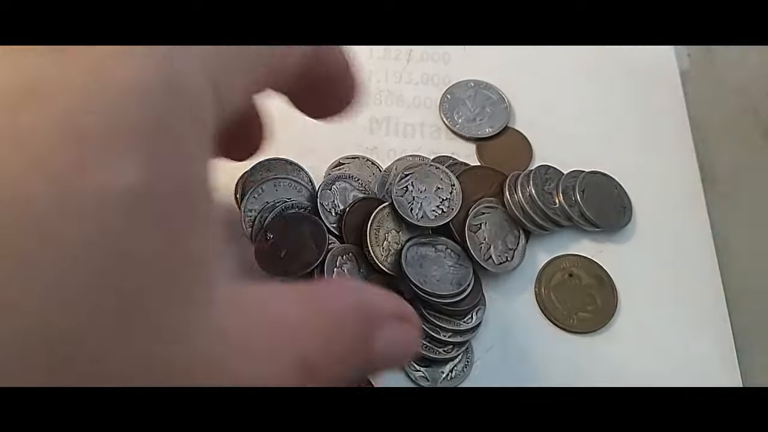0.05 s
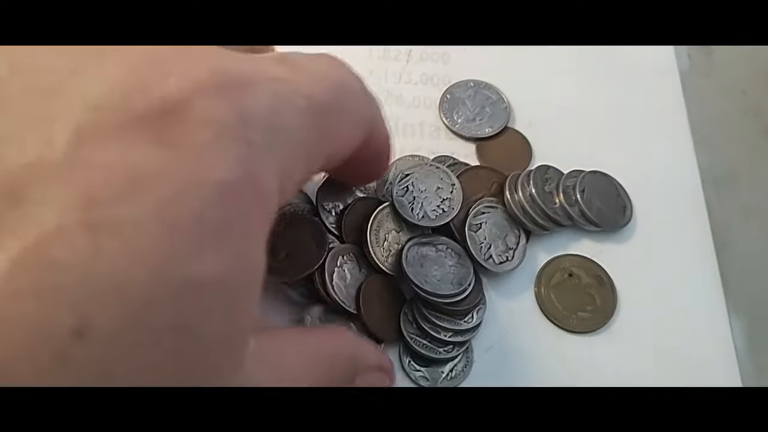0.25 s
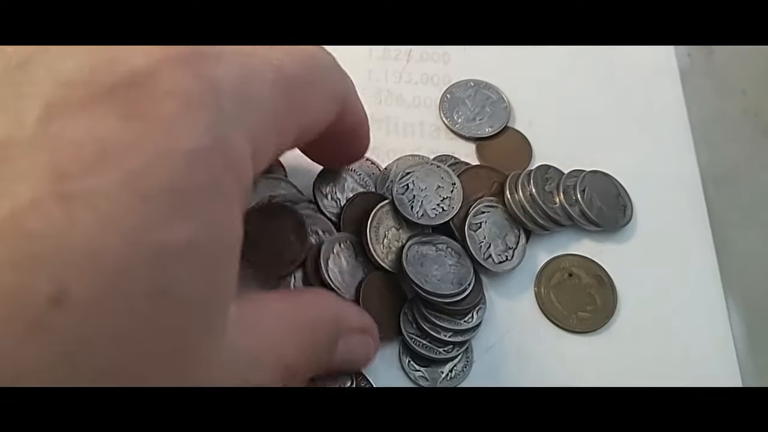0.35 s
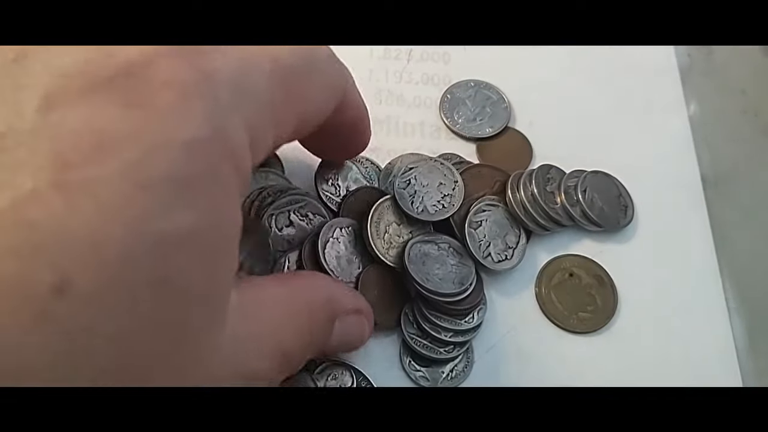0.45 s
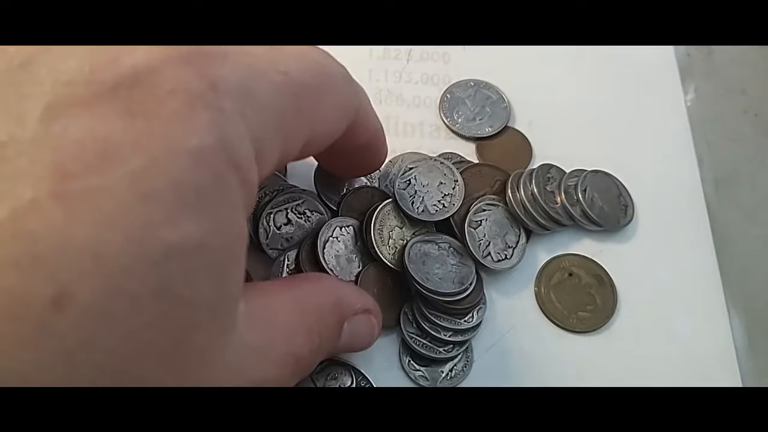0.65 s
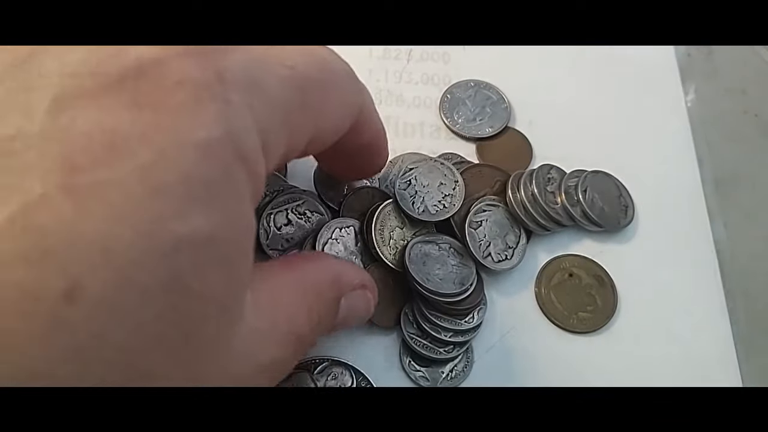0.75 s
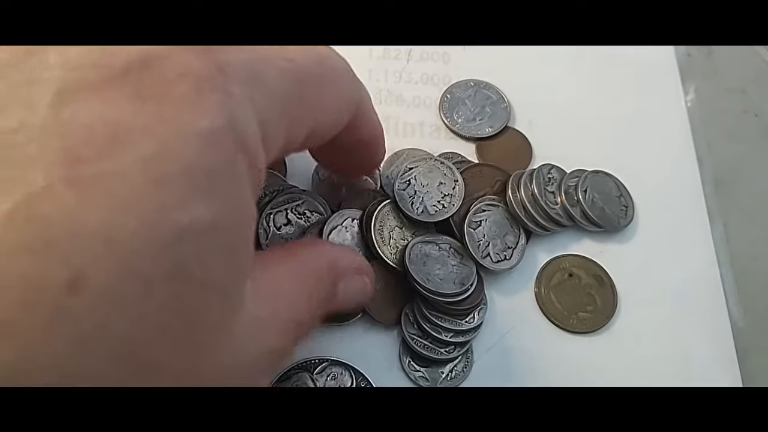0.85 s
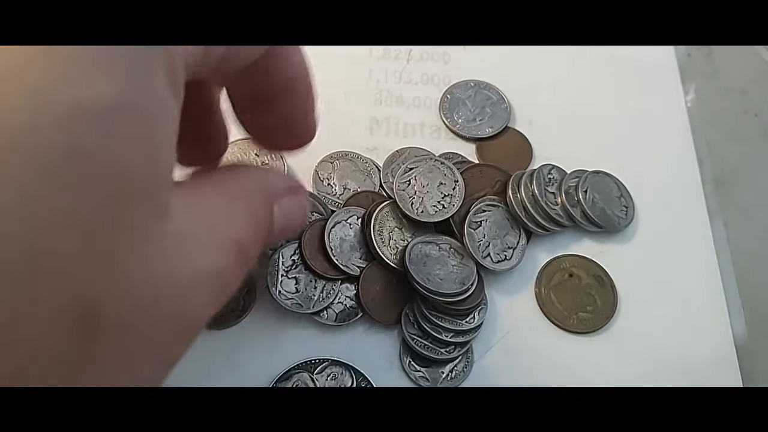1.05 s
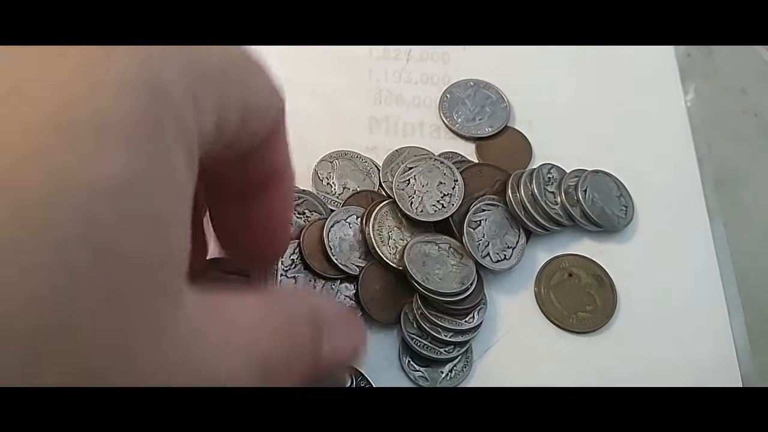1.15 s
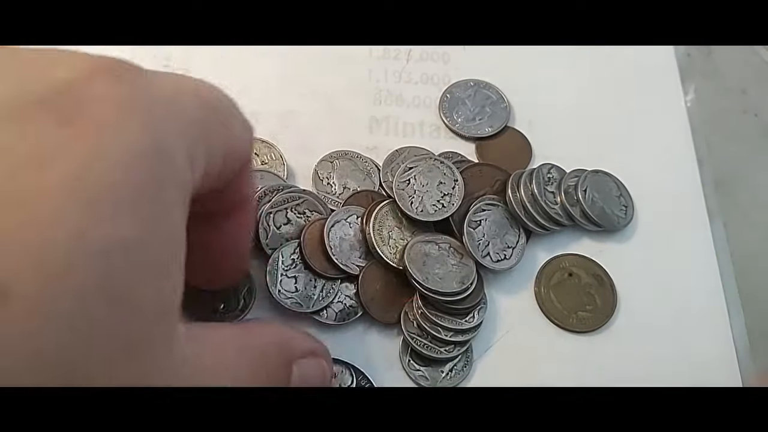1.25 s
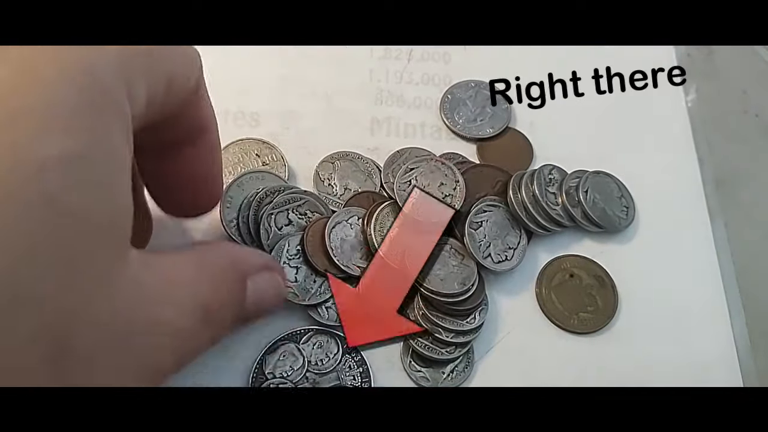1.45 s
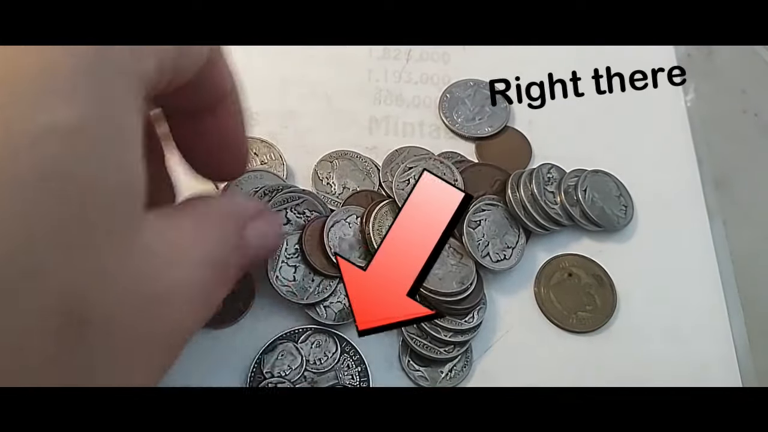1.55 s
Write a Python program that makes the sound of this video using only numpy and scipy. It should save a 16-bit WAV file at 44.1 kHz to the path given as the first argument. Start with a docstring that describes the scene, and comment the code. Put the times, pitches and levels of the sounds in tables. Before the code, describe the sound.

Metal coins clink and tick close by as a hand pushes a heap over paper with a faint scrape. Stacks drop and thump the table at about 0.2 and 0.6 seconds. From 0.7 seconds a coin rocks to rest with hollow knocks that get softer and quicker. At 1 second a last coin slips off with a bright clink, leaving only the faint tone of a small, quiet room.

```python
"""Coins tick and ring against each other as a hand pushes the heap over a sheet of paper on a table.
Twice a stack drops and the table top booms. Then a coin rocks to rest with hollow knocks,
and a last one slips off the heap with a bright clink.
Close to a stereo microphone in a small, quiet room: a short tail and faint room tone."""
import sys
import numpy as np
from scipy import signal
from scipy.fft import rfft, irfft
from scipy.io import wavfile
from scipy.ndimage import uniform_filter1d

SR = 44100
rng = np.random.default_rng(int(sys.argv[2]) if len(sys.argv) > 2 else 0)


def wrap_up_sound(samples):
    """Save the sound to the file named by the first command line argument, as 16-bit audio."""
    columns = np.atleast_2d(samples).T
    # keep every value between -1 and 1, then stretch to whole-number steps
    tamed = np.clip(columns, -1, 1)
    steps = np.round(tamed * 32767).astype(np.int16)
    wavfile.write(sys.argv[1], SR, steps)


N = 70560
T = np.arange(int(.4 * SR)) / SR  # time axis of one contact, s
TICK_RISE_S = .0006


def coin_ticks(rattle_decay_s=0.02, patchy_db=4.5):
    """Edge hits edge: a bright tick, each with its own uneven colour, then the neighbours rattle briefly."""
    # coin against coin: start_s, level_db, decay_s, pan_db, tilt_db_per_octave, rattle_db (re tick), kind
    contacts = [(0.0922, -60.5, 0.0045, -1, -4, -21, "heap"), (.1325, -39, 0.0019, 2, 2, -19, "heap"),
                (0.154, -43, 0.0017, -1, -1.5, -26, "heap"), (0.1957, -54.5, 0.0014, 2, -8, -6, "heap"),
                (0.2335, -41.5, 0.0013, -11, -3.5, -6, "heap"),
                (0.2406, -22.5, 0.0021, -3.5, -4.5, -25.5, "heap"),
                (0.2533, -39, 0.0031, 14, -0.5, -16, "heap"), (0.333, -56, .0015, -4, 1, -8, "heap"),
                (0.3628, -49.5, 0.0099, -8, -6, -12, "heap"),
                (0.3752, -40.5, 0.0032, -3, -2.5, -11.5, "heap"), (.391, -39, 0.0018, -4, 6, -11, "heap"),
                (0.3966, -33, 0.0042, -3.5, 2.5, -17, "heap"), (0.4225, -46, 0.0033, 10, 6, -18, "heap"),
                (0.4301, -51, 0.0031, -17, -8.5, -18, "heap"), (0.438, -44.5, 0.0027, 0, 0, -24, "heap"),
                (0.501, -51, 0.0022, -5, 3, -14.5, "heap"), (.5078, -40.5, 0.0028, -3, 4.5, -8.5, "heap"),
                (.575, -41, 0.0058, -0.5, -4, -13, "heap"), (.604, -31, 0.0031, -2, 7.5, -19, "heap"),
                (0.6138, -44.5, 0.006, -6, 1, -3, "heap"), (0.6395, -35.5, 0.0074, 0, 7, -24, "heap"),
                (0.9778, -52.5, 0.009, 0.5, 0, -3, "loose"), (0.9931, -23, 0.0018, -2, 0.5, -17, "loose"),
                (0.9973, -25.5, 0.00067, -1, 0, -14, "loose"),
                (1.002, -33.5, 0.0058, -3.5, 9, -14.5, "loose"),
                (1.0126, -25.5, 0.0021, 2, -0.5, -17, "loose"),
                (1.025, -37.5, 0.0027, 11.5, -0.5, -14.5, "loose")]
    # tick spectrum for each kind, "heap" and "loose": frequency_hz, density_db
    spectra = {"heap": [(1500, -17.5), (3500, -9.5), (5200, -9.5), (7000, -3), (8600, 0), (9800, -4),
               (11600, -3.5), (12700, -6.5), (14000, -2.5), (15500, 2), (16500, -9)],
               "loose": [(1500, -25.5), (3600, -13), (5000, -16.5), (6100, -1), (7000, -2), (7800, -6),
               (8600, 2), (9600, -15.5), (10400, -1), (11300, -10.5), (12200, -10), (12900, -14),
               (13500, -7), (14300, 2.5), (15000, 2), (16500, -3)]}
    out = np.zeros((2, N))
    for start_s, level_db, decay_s, pan_db, tilt, rattle_db, kind in contacts:
        colour = [(hz, db + tilt * np.log2(hz / 10000)) for hz, db in spectra[kind]]
        tick = burst(colour, TICK_RISE_S, decay_s, patchy_db)
        rattle = burst(colour, decay_s, rattle_decay_s, patchy_db)  # swells as the tick dies
        add(out, start_s, amp(level_db) * (tick + amp(rattle_db) * rattle), pan_db)
    return out


def coin_rings():
    """A coin that lies loose rings on in its own high modes."""
    # coins set ringing: start_s, level_db, pan_db, coin
    strikes = [(.575, -39, -4, "thick"), (.604, -38, -4, "thick"), (.6135, -40, -4, "thick"),
               (.9935, -31, 4, "thin"), (1.001, -38, 4, "thin")]
    # modes of a thick and of a thin coin: pitch_hz, level_db, t60_s
    thick = [(13340, 0, .15), (13470, -6, .09), (13900, -12, .09)]
    thin = [(7004, -1, .035), (8613, -7, .045), (12183, 0, .1), (12365, -5, .09), (13430, 0, .065),
            (14690, -4, .08), (14880, -2, .085)]
    out = np.zeros((2, N))
    for start_s, level_db, pan_db, coin in strikes:
        ringing = ring(thick if coin == "thick" else thin, TICK_RISE_S, scatter_turns=0.99)
        add(out, start_s, amp(level_db) * ringing, pan_db)
    return out


def coin_slaps(rise_s=0.00076, bandwidth_share=.13):
    """A coin lands flat on the paper: a duller slap with one broad resonance."""
    # landings: start_s, level_db, decay_s, resonance_hz, resonance_db (re slap), pan_db
    landings = [(.2361, -18.5, 0.0037, 3280, 2.5, 5.5), (0.25, -35, 0.01, 3240, -12, 0),
                (.364, -50.5, 0.019, 2520, -13, 7), (.398, -43.5, 0.0097, 2520, -5, 0),
                (0.5084, -42.5, 0.0052, 3360, 3.5, -8.5), (0.5761, -49, 0.0025, 5700, 5.5, -11),
                (0.598, -36.5, 0.009, 1770, -1.5, 2.5), (.6275, -28.5, 0.0096, 2740, -2, 4.5),
                (0.7211, -35, 0.0044, 2670, 2, 3), (.773, -35.5, 0.0021, 2540, -7, 0.5),
                (0.817, -52.5, 0.0052, 2580, -24, 20.5), (0.9942, -29, 0.0082, 6100, -9, 1),
                (1.013, -41.5, 0.014, 2270, -11, 3.5)]
    # slap spectrum: frequency_hz, density_db
    colour = [(50, -36.5), (200, -13), (500, 4), (1000, 8), (1600, -3.5), (2600, -1.5), (4200, -9),
              (5500, -21.5), (9000, -29.5), (16000, -44)]
    out = np.zeros((2, N))
    for start_s, level_db, decay_s, resonance_hz, resonance_db, pan_db in landings:
        slap = burst(colour, rise_s, decay_s)
        resonator = signal.iirpeak(resonance_hz, 1 / bandwidth_share, SR)
        body = signal.lfilter(*resonator, burst(colour, rise_s, decay_s)[0])
        body = amp(resonance_db) * body * slap.std() / body.std()
        wide_body = np.array([body, -body])  # opposite phase left and right
        add(out, start_s, amp(level_db) * (slap + wide_body), pan_db)
    return out


def table_thumps(low_cut_hz=122):
    """The table top booms under each blow; the deepest bass does not radiate."""
    # blows on the table: start_s, level_db, tilt_db_per_octave
    blows = [(0.2354, -12, 0), (0.2509, -34, 11.5), (0.3614, -41.5, 1), (.385, -42.5, -11.5),
             (.522, -50, -16.5), (0.544, -49.5, -18.5), (.575, -43.5, -11.5), (0.599, -42.5, -17),
             (.626, -16, -3), (0.6302, -23, 4)]
    # modes of the table top: pitch_hz, level_db, t60_s
    table_modes = [(99, -14.5, 0.069), (124.6, -6.5, .25), (170.4, -9.5, 0.2), (227.2, -0.5, 0.037),
                   (272.5, -2, 0.054), (361, -8, 0.087), (556, -3, .06), (834, -5.5, 0.018),
                   (1131, -14, 0.035)]
    out = np.zeros((2, N))
    for start_s, level_db, tilt in blows:
        modes = [(hz, db + tilt * np.log2(hz / 250), t60_s) for hz, db, t60_s in table_modes]
        boom = ring(modes, rise_s=0.00068, lag_s=0.00028, hold_s=0.00077)
        add(out, start_s, amp(level_db) * boom)
    return signal.sosfilt(signal.butter(3, low_cut_hz, "high", fs=SR, output="sos"), out)


def rocking_coin():
    """A coin rocks on the paper, left of centre; its last hollow knocks come softer and closer together."""
    # knocks: start_s, level_db, pitch_hz, rise_s, t60_s
    knocks = [(.2349, -17, 696, 0.00037, 0.022), (.336, -43, 704, 0.002, 0.024),
              (.3632, -37, 686, 0.00052, 0.091), (.399, -58, 756, 0.0027, 0.045),
              (.5752, -30, 720, .001, 0.039), (.5965, -18.5, 735, 0.00053, 0.023),
              (0.7197, -24, 786, 0.00046, 0.048), (.7715, -23, 790.5, 0.0023, 0.038),
              (.8165, -26, 792, 0.003, 0.045), (.8575, -30.5, 705, 0.0021, 0.035),
              (.876, -40, 760, 0.00067, 0.044), (.8945, -34, 800, 0.0025, .028),
              (.9198, -31, 777, 0.0013, 0.043), (.939, -28, 690, 0.0049, 0.015),
              (.951, -40.5, 740, 0.0023, 0.058), (.961, -66, 740, 0.0016, 0.1)]
    # modes of a knock: pitch_ratio, level_db, t60_share
    knock_modes = [(1, 0, 0.97), (1.41, -11, .8), (1.1, -22, 1), (2.25, -23.5, 1)]
    out = np.zeros((2, N))
    for start_s, level_db, pitch_hz, rise_s, t60_s in knocks:
        modes = [(pitch_hz * ratio, db, t60_s * share) for ratio, db, share in knock_modes]
        knock = ring(modes, rise_s, lag_s=.00023, hold_s=0.0004)
        add(out, start_s, amp(level_db) * knock, pan_db=5.5)
    return out


def paper_slide(uneven_db=3):
    """Coins drag over the paper with a soft scrape that flickers with the grip."""
    # course of the scrape: time_s, level_db
    swell = [(.22, -80), (.3, -46.5), (.37, -52.5), (.43, -59), (.48, -62.5), (.55, -54.5), (.66, -40.5),
             (.75, -60.5), (.95, -53), (1.08, -103)]
    # scrape spectrum: frequency_hz, density_db
    colour = [(60, -30), (130, -19.5), (350, 3.5), (700, 13.5), (1400, -5.5), (3000, -7), (5500, -49.5),
              (16000, -28)]
    grip = uniform_filter1d(rng.standard_normal(N), 300)
    return noise(colour, N) * envelope(swell) * amp(uneven_db * grip / grip.std())


def room_tail(direct, gap_s=.004):
    """The small room answers with a short diffuse tail, each band dying at its own speed."""
    # strength of the reflections: frequency_hz, level_db
    reflected = [(100, -21.5), (300, -3), (750, -4), (2000, -4), (4000, -6.5), (8000, -14), (15000, -11)]
    # reverberation time: frequency_hz, t60_s
    decay_times = [(100, 0.11), (400, 0.16), (1000, 0.15), (3500, 0.1), (8000, .18), (16000, 0.11)]
    white = noise([(1, 0), (SR, 0)], len(T))
    hz, t, bands = signal.stft(white, SR, nperseg=256)
    decay_rate = np.log(1000) / at_hz(decay_times, hz)[:, None]
    bands = bands * np.exp(-decay_rate * t) * np.sqrt(2 * decay_rate / SR)  # energy independent of t60
    bands *= amp(at_hz(reflected, hz))[:, None]
    tail = signal.istft(bands, SR, nperseg=256)[1][:, :len(T)]
    tail *= np.clip(T / gap_s - 1, 0, 1)  # silent for the gap, then fades in
    return signal.fftconvolve(direct, tail, axes=1)[:, :N]


def room_tone():
    """The faint noise of the quiet room, drifting by a few decibels."""
    # room tone spectrum: frequency_hz, density_db
    colour = [(18, -76.5), (30, -31.5), (189, -13), (252, -7), (303, 4), (526, -8), (780, -1), (962, -0.5),
              (1250, -6), (2010, -2), (2610, -7), (3980, -6.5), (6210, -28), (7270, -23), (16000, -32.5)]
    # its slow drift: time_s, level_db
    drift = [(0, -61.5), (.2, -60.5), (1.1, -63.5), (1.3, -63), (1.5, -59.5), (1.6, -61)]
    return noise(colour, N) * envelope(drift)


def noise(colour, size, patchy_db=0):
    """Coloured stereo noise of rms 1, alike in the bass and nearly unrelated in the treble."""
    # likeness of left and right at the microphone: frequency_hz, correlation (-1..1)
    likeness = [(60, 1), (300, 0.89), (750, 0.27), (1600, -0.13), (3200, 0.074), (7000, -0.13), (16000, 0)]
    hz = np.fft.rfftfreq(size, 1 / SR)
    left, unrelated = rfft(rng.standard_normal((2, size)))
    patches = uniform_filter1d(rng.standard_normal(len(hz)), size=240)  # chance bumps in the spectrum
    correlation = np.clip(at_hz(likeness, hz), -1, 1)
    right = correlation * left + np.sqrt(1 - correlation ** 2) * unrelated
    gain = amp(at_hz(colour, hz) + patchy_db * patches / patches.std())
    stereo = irfft(np.array([left, right]) * gain, size)
    return stereo / stereo.std()


def burst(colour, rise_s, decay_s, patchy_db=0):
    """The crack of a contact: noise that rises quickly, then falls to 1/e in decay_s."""
    fall = np.exp(-np.maximum(T - rise_s, 0) / decay_s)
    return noise(colour, len(T), patchy_db) * np.minimum(T / rise_s, 1) * fall


def ring(modes, rise_s, lag_s=0, scatter_turns=0, hold_s=0):
    """Dying sines that reach the right side lag_s later; scatter_turns gives each a chance phase."""
    t = np.maximum(T - np.array([[0], [lag_s]]), 0)
    out = 0
    for hz, db, t60_s in modes:
        turns = hz * t + scatter_turns * rng.random((2, 1))
        fall = np.exp(-np.log(1000) * np.maximum(t - rise_s - hold_s, 0) / t60_s)
        out = out + amp(db) * fall * np.sin(2 * np.pi * turns)
    return out * np.minimum(t / rise_s, 1)


def amp(db):
    """Decibels to gain."""
    return 10 ** (np.asarray(db) / 20)


def at_hz(points, hz):
    """Interpolates rows of frequency_hz, value on a log-frequency axis."""
    point_hz, value = np.transpose(points)
    return np.interp(np.log(hz + 1), np.log(point_hz + 1), value)


def envelope(points):
    """Rows of time_s, level_db as a gain for every sample."""
    return amp(np.interp(np.arange(N) / SR, *np.transpose(points)))


def add(mix, start_s, sound, pan_db=0):
    """Lays a stereo sound into the mix; pan_db is left minus right."""
    part = mix[:, max(round(start_s * SR), 0):][:, :sound.shape[1]]
    part += sound[:, :part.shape[1]] * amp([[pan_db / 2], [-pan_db / 2]])


def scene(table_send_db=-1):
    """Coins and table close up, with the room behind them; the ringing and the scrape stay dry."""
    coins = coin_ticks() + coin_slaps() + rocking_coin()
    table = table_thumps()
    reflections = room_tail(coins + amp(table_send_db) * table)
    return coins + coin_rings() + table + reflections + paper_slide() + room_tone()


def record(dry, edge_hz=15900):
    """The recorder's band limit: a steep low-pass."""
    taps = signal.firwin(255, edge_hz, window=("kaiser", 9), fs=SR)
    return signal.oaconvolve(dry, taps[None], "same")


dry = scene()
out = record(dry)
wrap_up_sound(out)
```